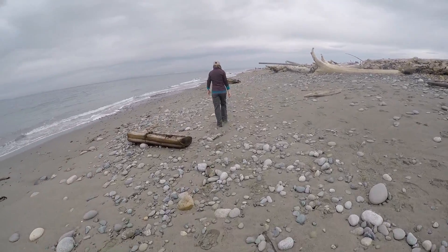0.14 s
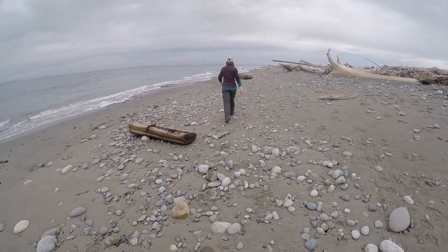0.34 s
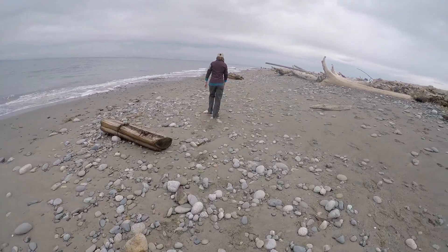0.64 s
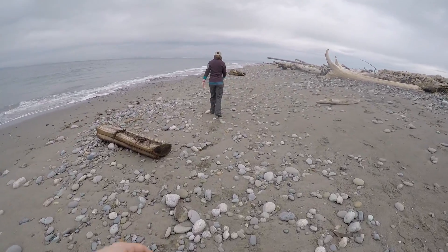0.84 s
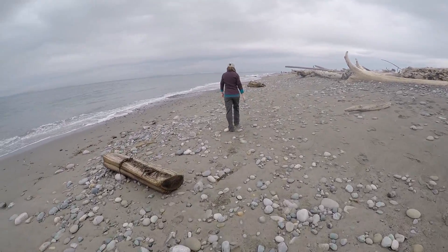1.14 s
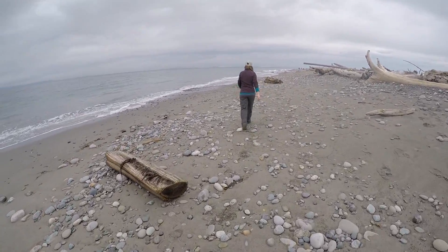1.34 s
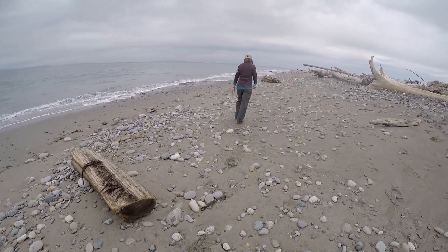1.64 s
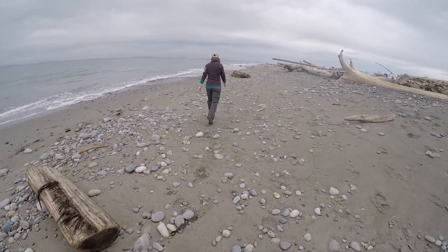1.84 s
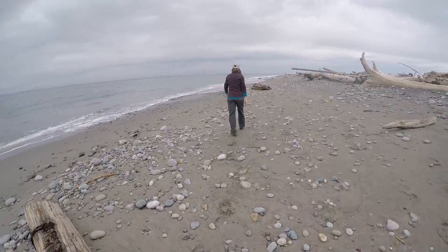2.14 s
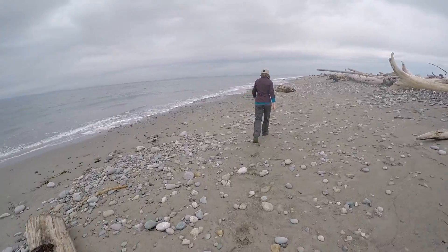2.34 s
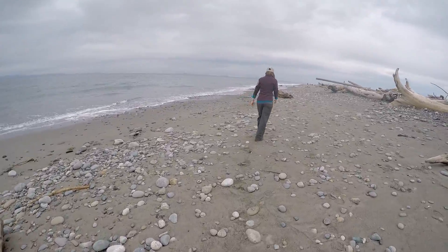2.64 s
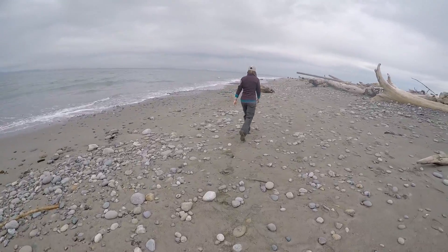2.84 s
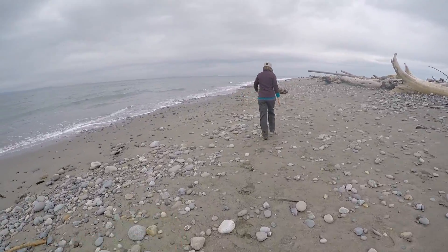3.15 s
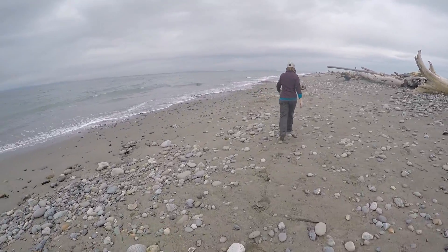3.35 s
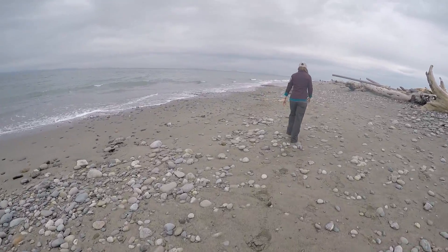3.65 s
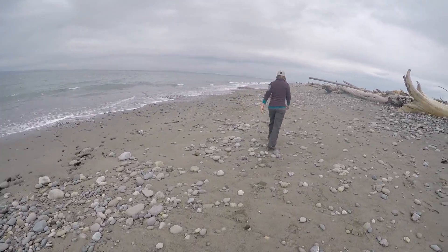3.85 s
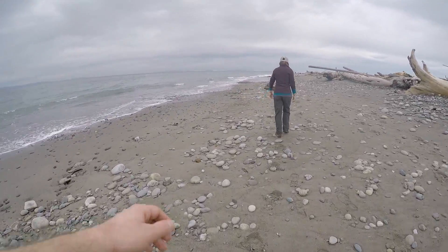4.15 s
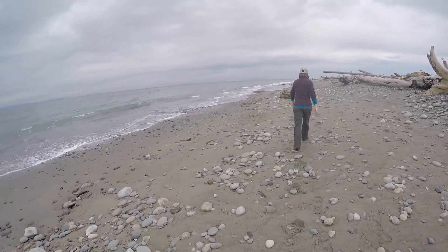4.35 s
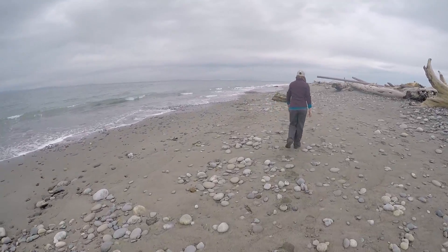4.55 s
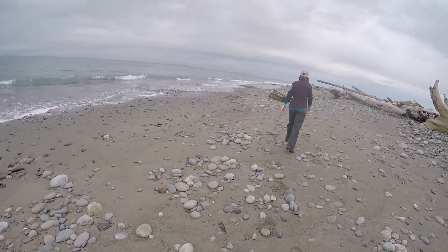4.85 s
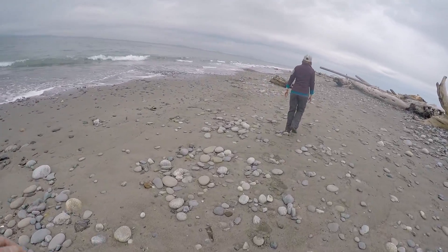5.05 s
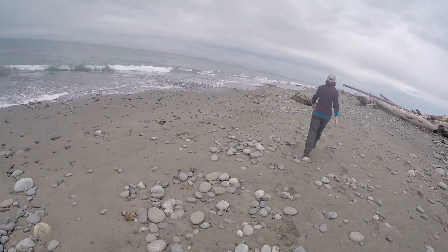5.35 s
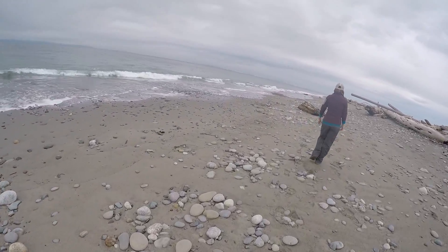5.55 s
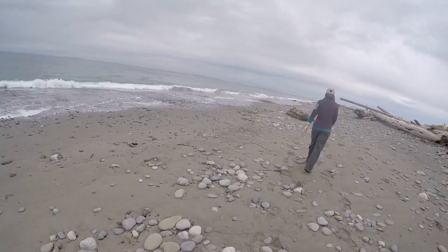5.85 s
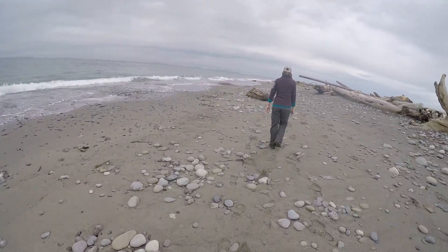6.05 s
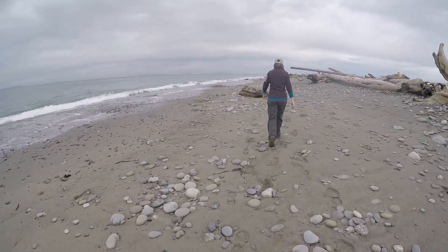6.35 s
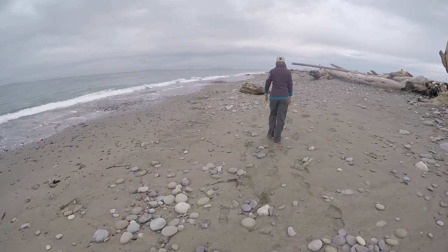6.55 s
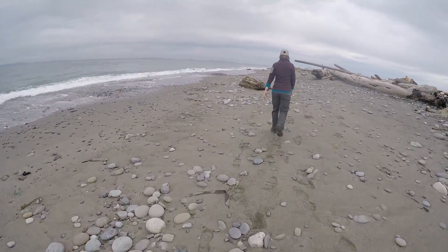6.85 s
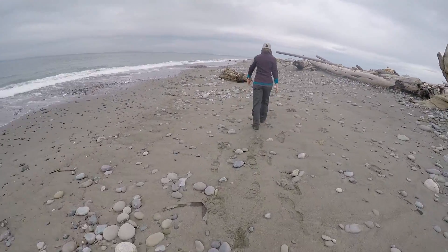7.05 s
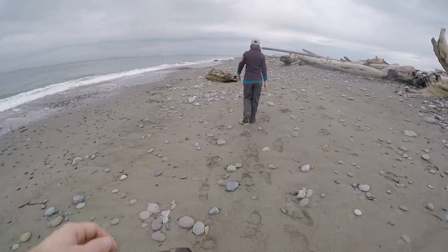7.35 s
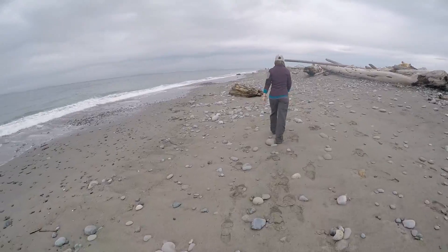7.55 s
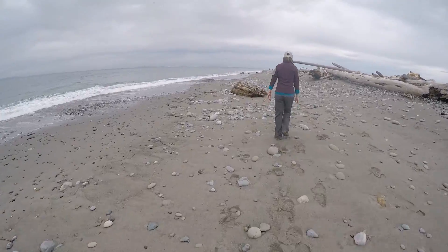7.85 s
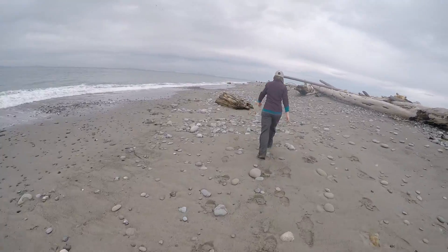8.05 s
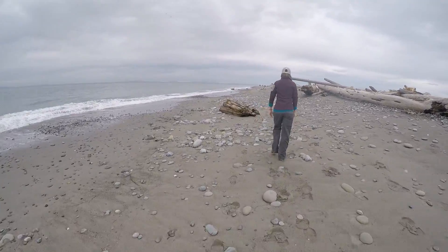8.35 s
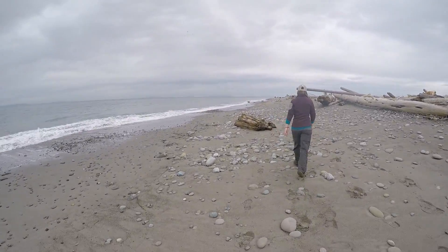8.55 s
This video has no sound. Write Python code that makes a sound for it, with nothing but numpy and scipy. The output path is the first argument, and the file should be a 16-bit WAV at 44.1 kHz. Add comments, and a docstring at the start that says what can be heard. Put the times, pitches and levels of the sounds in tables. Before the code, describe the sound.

Footsteps jolt a body-worn housed microphone with low thumps, knocks and bright buckle ticks, while surf hisses, pebbles click and sand crunches.

```python
"""A walk along a sand and pebble beach, heard by a camera in a plastic housing strapped to the walker.
From the start, footfalls shake the mount: low swinging sines, ringing knocks and bright buckle ticks.
Far surf (filtered noise) and wind rumble (low noise) run throughout, with foam fizz made of tiny grains.
Sand soon crunches in bursts of grains, pebbles click from 1.4 s, and cloth rubs the housing from 3.2 s.
A wave breaks from 4.5 s and its fizz surges as it runs up until 5.8 s; then the steps crunch on."""
import sys
import numpy as np
from scipy import signal
from scipy.fft import rfft, irfft
from scipy.io import wavfile

SR = 44100
rng = np.random.default_rng(int(sys.argv[2]) if len(sys.argv) > 2 else 0)


def file_out(sig):
    """Save sig as 16-bit WAV at sys.argv[1]."""
    # one column per channel
    cols = np.atleast_2d(sig).T
    # limit, then scale
    lim = np.clip(cols, -1, 1)
    pcm = np.round(lim * 32767).astype(np.int16)
    wavfile.write(sys.argv[1], SR, pcm)


N = 384111

# usual levels of the surf over time, with a wave breaking from 4.5 s:
# (time_s, wash_db, dull_roar_db, spray_hiss_db)
SURF_LEVELS = [(0.0, -55, -61, -66.5), (0.55, -54.5, -59, -68.5), (0.9, -57.5, -62, -70),
               (1.9, -61, -63.5, -70), (2.6, -59, -62.5, -70.5), (2.96, -64, -64, -71.5),
               (3.6, -59.5, -65, -70), (4.27, -58, -62, -70), (4.5, -56, -63, -69), (4.63, -51, -62, -65),
               (4.87, -49.5, -59, -65), (5.2, -50.5, -56, -62.5), (5.63, -46, -53, -59),
               (6.1, -48.5, -53, -60), (6.62, -48, -53.5, -61.5), (7.4, -49.5, -53.5, -65),
               (8.15, -50.5, -56.5, -65), (8.71, -51.5, -56.5, -62)]


def from_db(db):
    """Turn decibels into a plain multiplier."""
    return 10 ** (np.asarray(db) / 20)


def rms_one(x):
    """Scale a signal to an average strength (rms) of 1."""
    return x / np.sqrt(np.mean(x ** 2) + 1e-20)


def in_time(rows):
    """Draw straight lines between table rows: one value per sample for each column after the time."""
    time_s, *columns = np.transpose(rows)
    now_s = np.arange(N) / SR
    return [np.interp(now_s, time_s, column) for column in columns]


def drift(rate_hz):
    """A slow random wander of spread 1: noise smoothed by two equal one-pole low-pass filters."""
    pole = np.exp(-40 * np.pi * rate_hz / SR)   # computed at every 20th sample
    noise = rng.standard_normal(N // 20 + 2002)
    slow = signal.lfilter([1], [1, -2 * pole, pole * pole], noise)[2000:]   # skip the settling
    return np.interp(np.arange(N) / 20, np.arange(len(slow)), rms_one(slow))


def coloured(x, spectrum):
    """Give a signal the spectrum of a table, falling away within an octave outside it; rms 1."""
    below, above = (spectrum[0][0] / 2, -80), (spectrum[-1][0] * 2, -80)
    hz, db = np.transpose([below] + spectrum + [above])
    grid_hz = np.arange(N // 2 + 1) * SR / N + 1   # the 1 avoids log(0)
    gain = from_db(np.interp(np.log(grid_hz), np.log(hz), db))
    return rms_one(irfft(rfft(x) * gain, N))


def ring(force, hz, t60_s):
    """A struck mode: a unit click starts a sine of height 1 that loses 60 dB in t60_s."""
    decay, w = from_db(-60 / (t60_s * SR)), 2 * np.pi * hz / SR
    return signal.lfilter([0, np.sin(w)], [1, -2 * decay * np.cos(w), decay * decay], force + 1e-18)


def contacts(times_s, levels_db, chatter_s, count, soft_hz, rattle):
    """Each blow is one main touch amid others of relative size up to rattle, rounded by soft contact."""
    force = np.zeros(N + SR)
    chance = rng.random((len(times_s), count, 2))
    main = np.arange(count) == 0
    lag_s = np.where(main, .4, chance[..., 0]) * chatter_s
    size = np.where(main, 1, rattle * (2 * chance[..., 1] - 1)) * from_db(levels_db)[:, None]
    np.add.at(force, ((times_s[:, None] + lag_s) * SR).astype(int), size)
    soft = signal.butter(4, min(soft_hz, .45 * SR), fs=SR, output="sos")
    return signal.sosfilt(soft, force[:N] + 1e-18)


def swells(times_s, peaks_db, rise_s, fall_s):
    """Power sum of events that gain 10 dB in rise_s before their peak and lose 10 dB in fall_s after."""
    age_s = np.arange(0, N + 40, 40)[:, None] / SR - times_s   # computed at every 40th sample
    tens = np.where(age_s < 0, -age_s / np.abs(rise_s), age_s / np.abs(fall_s))
    levels_db = peaks_db - 10 * np.minimum(tens, 9)   # never more than 90 dB below the peak
    size = np.sqrt(np.sum(from_db(levels_db) ** 2, axis=1))
    return np.interp(np.arange(N) / 40, np.arange(len(size)), size)


def cavity(x):
    """Air space before the microphone: a chain of filters, each lifting the sound around one pitch."""
    # resonances of the air space: (pitch_hz, width_hz, lift_db)
    resonances = [(675, 320, 5), (1816, 320, 7.5), (2316, 183, 8), (2727, 107, 6), (3505, 660, 15.5),
                  (4190, 240, 2.5), (6400, 810, 3.5), (7850, 300, 5.5), (9930, 2400, 8), (12800, 1200, 1.5)]
    for hz, width_hz, lift_db in resonances:
        w, a = 2 * np.pi * hz / SR, from_db(lift_db / 2)
        k = np.pi * width_hz / SR
        middle = -2 * np.cos(w)
        x = signal.lfilter([1 + k * a, middle, 1 - k * a], [1 + k / a, middle, 1 - k / a], x)
    return x


def grains(per_s, low_hz, high_hz, cycles):
    """Clumped clicks of uneven size, each ringing a few cycles, heard through the air space; rms 1."""
    sizes = from_db(3.0 * np.minimum(rng.exponential(1, N), 4)) * rng.choice([-1, 1], N)
    born = rng.random(N) < per_s * from_db(3.0 * drift(30)) / SR
    pitches_hz = np.geomspace(low_hz, high_hz, 6)
    dealt = rng.integers(0, 6, N)   # which pitch each grain gets
    rings = sum(ring(sizes * born * (dealt == k), hz, cycles / hz) for k, hz in enumerate(pitches_hz))
    soft = signal.butter(8, 1.02 * high_hz, fs=SR, output="sos")   # sand cushions the contact
    return rms_one(cavity(signal.sosfilt(soft, rings)))


def surf():
    """Far water: three smooth noise layers that flicker slightly, partly together."""
    # spectrum of the wash of the water: (pitch_hz, level_db_per_hz)
    wash_spectrum = [(900, -44), (1300, -3), (2000, 2.5), (3000, -11), (4500, -10), (6000, -47)]
    # spectrum of the dull roar: (pitch_hz, level_db_per_hz)
    roar_spectrum = [(120, 2.5), (250, 0), (500, -3.5), (900, -5), (1400, -2.5), (2000, -6.5)]
    # spectrum of the spray hiss: (pitch_hz, level_db_per_hz)
    spray_spectrum = [(3500, -39), (4800, 0), (7000, -4), (9000, -11.5), (12000, -9.5), (15500, -9)]
    spectra, flickers_db = (wash_spectrum, roar_spectrum, spray_spectrum), (1.0, 1.5, .7)
    together = drift(1.37)
    out = 0
    for db, spectrum, flicker_db in zip(in_time(SURF_LEVELS), spectra, flickers_db):
        noise = rms_one(cavity(coloured(rng.standard_normal(N), spectrum)))
        flicker = flicker_db * (0.68 * together + drift(23.0))
        out = out + from_db(db + flicker) * noise
    return out


def crunch():
    """Coarse and fine grains: fizzing foam throughout, sand and kicked grit under the stride."""
    # crunches of sand and kicked grit; from 4.8 to 5.8 s surges of fizz as the wave runs up:
    # (peak_s, coarse_db, fine_grit_share_db, gain_10_db_s, lose_10_db_s); signs of the last two are ignored
    bursts = [(0.65, -63, -18, 1, 1.5), (1.29, -60.5, -13, 0.5, 0.11), (1.468, -51, -22, .03, .025),
              (1.515, -41, 1, .0004, .014), (1.5335, -46, 2, .0006, .012), (1.5165, -53, -3, .0007, .15),
              (1.5795, -47, -7, .0006, .015), (1.917, -54.5, -20, .03, .025), (2.0, -53, -19, 0.05, .015),
              (2.115, -62, 5, .015, .02), (2.91, -59.5, -19, 0.25, 0.26), (3.25, -51.5, -10, .08, 0),
              (3.55, -50.5, -12, 0, .09), (3.71, -55, -14, 0.06, .05), (3.87, -53, -12, 0, 0),
              (3.97, -53.5, -13, 0, .14), (4.8, -54, 0, 0.06, 0.5), (5.22, -54.5, -0.5, 0.07, 0.9),
              (5.56, -50.5, -3, 0.1, 0.2), (5.78, -52, -5, 0.17, 0), (6.372, -44, -6, .004, .006),
              (6.735, -49, -5, .015, 0.07), (7.45, -54, -8, .02, .015), (8.445, -48, -12, -0.04, -0.2)]
    peak_s, coarse_db, grit_db, rise_s, fall_s = np.transpose(bursts)
    wash_db, _, spray_db = in_time(SURF_LEVELS)
    foam_coarse, foam_fine = from_db(wash_db - 8.5), from_db(spray_db + 0.5)
    coarse = np.hypot(swells(peak_s, coarse_db, rise_s, fall_s), foam_coarse)
    fine = np.hypot(swells(peak_s, coarse_db + grit_db, rise_s, fall_s), foam_fine)
    return (coarse * grains(per_s=2000, low_hz=2080, high_hz=2850, cycles=6.3)
            + fine * grains(per_s=4500, low_hz=3500, high_hz=7580, cycles=7.1))


def pebbles():
    """Each small stone gives a narrow, rounded blip at its own pitch: a resonance applied twice."""
    # single pebbles clicking together: (start_s, peak_db, pitch_hz)
    clicks = [(1.4376, -46, 2350), (1.517, -44, 3540), (1.5364, -47, 3470), (3.244, -46, 2410),
              (3.5273, -40.5, 2350), (3.5448, -40, 2290), (3.557, -39.5, 3520), (3.8744, -48, 2290),
              (4.608, -39.5, 2350), (5.8994, -43, 2080), (6.573, -39, 2310), (8.459, -44, 2640)]
    out = 0
    for start_s, peak_db, hz in clicks:
        force = contacts(np.array([start_s]), [0], chatter_s=0.00199, count=3, soft_hz=1.7 * hz, rattle=.4)
        blip = ring(ring(force, hz, t60_s=0.0049), hz, t60_s=0.014)
        out = out + from_db(peak_db) * blip / np.abs(blip).max()
    return out


def rubs():
    """Cloth on the housing: coarse, dull slips while it drags, swelling and fading."""
    # cloth rubs against the housing: (peak_s, level_db, lose_10_db_s)
    drags = [(3.25, -50, .06), (3.34, -56, .04), (6.373, -39, .011), (6.42, -59, .06), (6.595, -51, .015)]
    peak_s, level_db, fall_s = np.transpose(drags)
    size = swells(peak_s, level_db, .8 * fall_s, fall_s)
    return size * grains(per_s=340, low_hz=190, high_hz=704, cycles=5.6)


def ticks():
    """Loose buckle: hard, short rattles ring a bright cluster of modes and a lower one."""
    # buckle ticks, levels before the trims below: (start_s, bright_level_db, lower_part_against_it_db)
    buckle_hits = [(0.1367, -31, -9), (0.53, -28, -10), (0.6584, -50, -10), (0.665, -37, -23),
                   (0.7, -45, -9), (0.7038, -34.5, -9.5), (1.1887, -39, -18), (1.2034, -29.5, -5.5),
                   (1.6145, -38, -2), (1.713, -46, -17), (1.748, -39.5, -30), (2.161, -40.5, 0),
                   (2.2344, -57, -8), (2.2378, -43, -19), (2.261, -29.5, -8), (2.6579, -32, -8.5),
                   (2.761, -44, -24), (2.771, -41, -21), (2.813, -34.5, -8), (3.2804, -47, -15),
                   (3.2976, -30.5, -7.5), (3.7176, -29, -9.5), (3.8425, -41, -22), (4.2515, -34.5, -10),
                   (4.354, -29.5, -9), (4.8045, -30, -11.5), (5.3934, -29, -10), (5.9523, -43, -11),
                   (6.4272, -39, -20), (6.4615, -33, -10), (6.9132, -29, -9), (7.0544, -37, -11),
                   (7.5397, -37, -15), (7.5477, -29, -13), (7.861, -37.5, -14), (7.9544, -53.5, 0),
                   (7.9676, -40.5, -12), (8.051, -41, -14), (8.058, -48, -6), (8.54, -29, -9)]
    # bright modes of the buckle: (pitch_hz, level_db, t60_s)
    high_modes = [(7210, -8, 0.0069), (9470, -13.5, 0.012), (10390, -0.5, 0.003), (11430, -13, 0.004),
                  (14100, -14, 0.0059)]
    # lower modes of the buckle: (pitch_hz, level_db, t60_s)
    low_modes = [(3770, 0, 0.016), (4526, 2, 0.014), (5230, -4, 0.0082)]
    start_s, bright_db, lower_db = np.transpose(buckle_hits)
    out = 0
    for modes, levels_db in ((high_modes, bright_db - 5.5), (low_modes, bright_db + lower_db - 4.5)):
        for hz, db, t60_s in modes:
            force = contacts(start_s, levels_db + db, chatter_s=0.0023, count=6, soft_hz=1.16 * hz, rattle=0.88)
            out = out + ring(force, hz, t60_s)
    return out


def knocks():
    """Each knock strikes the housing modes in its own mix; modes next in the table start in opposite senses."""
    # housing knocks, overall level and the share of each group of modes:
    # (start_s, level_db, low_db, middle_db, upper_db, crack_and_deep_thump_db, thud_db)
    blows = [(0.061, -44, -11.5, -14, -12, -16, -4), (0.109, -43.5, -14, -8, -4, -13, -8),
             (0.202, -36.5, -20, -7, -8, -21, -13), (0.525, -37, -7.5, -14, -25, -19, -16),
             (0.664, -38, -13.5, -7.5, -12, -11, -11), (1.188, -37, -18, -7, -19, -15, -6),
             (1.239, -52, 1, -10, 0, -11, 4), (1.266, -22, -20, -11, -7.5, -20.5, -12),
             (1.629, -41.5, -7, -13, -8, -12, -9), (1.663, -43, -13, -9, -11, -11, -7),
             (1.747, -37, -25, -5.5, -14, -11, -5), (2.121, -46.5, -10, -12, -24, -19, -13),
             (2.138, -32.5, -5.5, -10, -17, -22, -13), (2.157, -16, -22.5, -12.5, -11.5, -28, -12),
             (2.238, -39, -29, -4.5, -14, -9, -5), (2.29, -38, -9, -11, -4.5, -27, -7),
             (2.313, -32, -16, -11.5, -8, -35, -6.5), (2.64, -46.5, -4.5, -17, -6, -21, -18),
             (2.76, -46, -28, -1.5, -12, -11, -8), (2.772, -40, -11.5, -7, -14, -10, -8),
             (3.012, -35, -8.5, -15.5, -32, -32, -30), (3.181, -39.5, -10, -9, -18, -12, -22),
             (3.248, -46.5, -3, -22, -13, -13, 0), (3.264, -43, -19, -12, -24, -11, -3),
             (3.282, -38, -26, -1, -28, -17, -7), (3.314, -48.5, -3, -18, -17, -14, 13.5),
             (3.335, -47, -3, -22, -12, -11, 5), (3.346, -44, -5, -10, -1, -7.5, 4),
             (3.376, -29, -17, -10.5, -6, -22, -11), (3.685, -60, 9, -8, 0, -6, 2),
             (3.713, -25.5, -9.5, -12, -15, -23, -39), (3.843, -33, -20.5, -8.5, -5, -14, -11.5),
             (4.23, -29, -10.5, -9, -15, -22, -36), (4.354, -46.5, -17.5, 0.5, -7, -23, -3),
             (4.403, -45.5, -9.5, -14, -9, -11, -3.5), (4.544, -25.5, -22, -14, -8, -29, -15),
             (5.873, -24, -7, -9.5, -31, -23.5, -32), (5.951, -44, -15, -3, -11, -17, -19),
             (6.368, -21.5, -8, -6, -7, -12, -4.5), (6.419, -39.5, -19, -4, -9, -15, -12),
             (6.59, -28, -18, -9, -1, -18, -10.5), (7.049, -41, -12, -7.5, -9, -10, -3.5),
             (7.444, -36.5, -10.5, -7, -16, -17, -27), (7.542, -38, -15, -8.5, -5, -21, -8),
             (7.606, -22.5, -22.5, -17.5, -9, -40, -9.5), (7.965, -31.5, -8.5, -16, -7, -24, -26),
             (8.052, -40, -14, -6.5, -15, -12, -3.5), (8.565, -38, -9, -9, -14, -20, 2),
             (8.576, -26, -20, -16, -12, -30, -15)]
    # housing modes; the group counts the five shares above from 0: (group_number, pitch_hz, level_db, t60_s)
    modes = [(0, 602.5, -1.5, 0.081), (0, 535, 1.5, 0.011), (0, 743, 5.5, 0.013), (1, 1141, 3.5, 0.024),
             (0, 991, 6, 0.011), (1, 1297, -6.5, 0.017), (2, 1629, 1, 0.019), (3, 2370, 6.5, 0.014),
             (3, 74.5, 20, 0.033), (4, 136.6, 10, 0.014), (4, 293, -9, 0.021)]
    start_s, level_db, *shares_db = np.transpose(blows)
    out = 0
    for k, (group, hz, db, t60_s) in enumerate(modes):
        levels_db = level_db + shares_db[round(group)] + db
        force = contacts(start_s, levels_db, chatter_s=0.00495, count=6, soft_hz=1.464 * hz, rattle=0.74)
        out = out + (-1) ** k * ring(force, hz, t60_s)
    return out


def swing(size, hz, unsteady):
    """A strap swinging on its own spring: a slow sine whose pace and size wander."""
    pace_hz = hz * np.exp(unsteady * 1.5 * np.tanh(drift(11.0) / 1.5))   # tanh limits the wander
    turns = np.cumsum(pace_hz) / SR
    return np.sqrt(2) * size * from_db(1.27 * drift(26.6)) * np.sin(2 * np.pi * turns)


def mount():
    """Each jolt swings the strap in two unsteady ways and stirs up the lumpy low noise of wind and rubbing."""
    # jolts of the mount, a few to each stride; levels before the random wander:
    # (peak_s, slow_swing_db, quick_swing_db, rumble_db, swing_length_factor)
    shakes = [(0.02, -34.5, -42.5, -62, 0.97), (0.09, -43, -46, -55, 0.95), (0.152, -31.5, -38, -48, 0.97),
              (0.36, -59, -57, -62.0, 1.05), (0.553, -28.0, -36.5, -57.0, 1),
              (0.638, -27.5, -28.0, -54, 0.93), (0.71, -47, -38.5, -53.0, 1.05),
              (1.153, -28, -27.5, -47.5, 0.99), (1.27, -45, -43, -47, 0.93), (1.56, -29, -30, -56.0, 1.05),
              (1.647, -32, -30.5, -49.0, 1.1), (1.725, -36, -48, -49, 1), (2.171, -22.5, -34, -44, 0.96),
              (2.24, -37, -44, -56, 1.05), (2.3, -44.5, -44, -53, 0.97), (2.542, -43, -55, -62.0, 1.05),
              (2.665, -27.5, -38, -59, 0.99), (2.79, -43, -45, -51.5, 1.3),
              (3.164, -33.5, -35.5, -52.0, 1.1), (3.25, -33, -47, -51.0, 1.05), (3.35, -45, -45, -47, 0.87),
              (3.67, -30.5, -28.5, -46, 1.05), (3.745, -27.5, -34.5, -53, 0.97),
              (3.859, -46, -51, -52, 1.05), (4.171, -34.0, -30, -53, 1.05),
              (4.324, -29.5, -41.0, -48, 1.05), (4.567, -54, -41.5, -51.5, 0.94),
              (4.678, -33.5, -35, -59, 1.05), (4.791, -30.5, -34.5, -56, 1.2),
              (5.0, -42.5, -55.0, -61.0, 1.05), (5.173, -33.5, -31.5, -50, 1), (5.26, -38, -42.5, -56, 1.2),
              (5.391, -32.5, -50, -61.0, 1.15), (5.677, -32, -34.5, -49.5, 0.97),
              (5.888, -25.5, -39.0, -51.0, 1.05), (6.0, -40, -46, -60, 0.93), (6.169, -36, -35, -46, 0.94),
              (6.383, -25.5, -31.5, -40, 1.07), (6.55, -39, -40.0, -47, 1.05),
              (6.666, -32.5, -36.5, -55.0, 1.1), (6.925, -28.5, -31, -52, 1.05),
              (7.01, -37, -43, -57, 1.05), (7.177, -42, -37, -61, 0.93), (7.441, -33, -38, -57, 1.05),
              (7.56, -45, -50, -50.0, 1.05), (7.672, -34.5, -40, -51, 0.97), (7.977, -23, -32.5, -58, 1.05),
              (8.05, -35, -41, -55, 1.05), (8.189, -31, -37, -51, 0.98), (8.281, -43, -61, -68, 1.05),
              (8.415, -39.5, -34, -59.0, 1.05), (8.51, -33.5, -43.5, -58.0, 1.1),
              (8.585, -48, -42, -50, 0.63), (8.68, -34.5, -36.5, -52, 0.9)]
    # steady wind on the port, before the random wander: (time_s, level_db)
    wind = [(0, -60), (1, -64.5), (2.5, -61.5), (3.5, -59), (4.5, -61), (5.5, -60.5), (6.5, -57),
            (7.5, -57), (8.71, -60)]
    # spectrum of the low rumble: (pitch_hz, level_db_per_hz)
    rumble_spectrum = [(35, -46), (70, 5), (120, -2.5), (200, -20.5), (400, -29.5), (800, -25.5)]
    peak_s, slow_db, quick_db, rumble_db, length = np.transpose(shakes)
    # rise and fall: seconds to gain or lose 10 dB; the rest is the wandering level between jolts
    slow_rest, quick_rest = from_db(-56 + 3.7 * drift(4.5)), from_db(-56 + 3.9 * drift(7.5))
    slow = np.hypot(swells(peak_s, slow_db, 0.048 * length, 0.052 * length), slow_rest)
    quick = np.hypot(swells(peak_s, quick_db, 0.036 * length, 0.039 * length), quick_rest)
    stir = np.hypot(swells(peak_s, rumble_db, rise_s=.05, fall_s=.07), from_db(in_time(wind)[0]))
    lumps = from_db(5.43 * drift(10.9))
    rumble = stir * lumps * coloured(rng.standard_normal(N), rumble_spectrum)
    return swing(slow, hz=24.23, unsteady=0.23) + swing(quick, hz=46.24, unsteady=0.24) + rumble


def scene():
    """Sound through the air and sound through the housing add up at one microphone."""
    through_air = surf() + crunch() + pebbles()
    through_housing = rubs() + ticks() + knocks() + mount()
    return (through_air + through_housing)[None]


def record(dry):
    """The treble is cut steeply: 80 dB down from 16.1 kHz upward."""
    return signal.sosfilt(signal.cheby2(14, 80, 16100, fs=SR, output="sos"), dry)


dry = scene()
out = record(dry)
file_out(out)
```